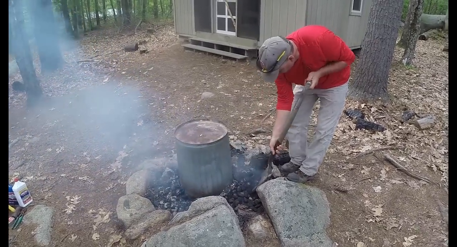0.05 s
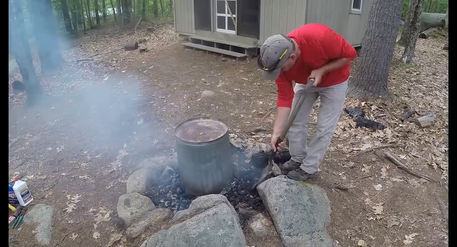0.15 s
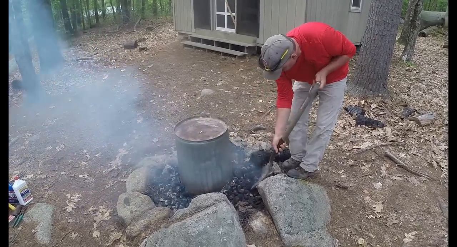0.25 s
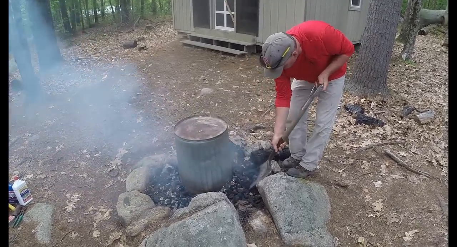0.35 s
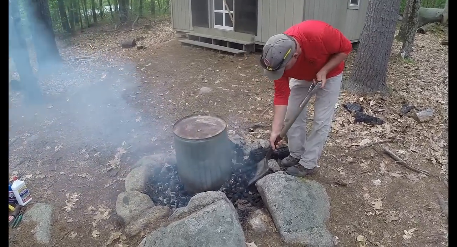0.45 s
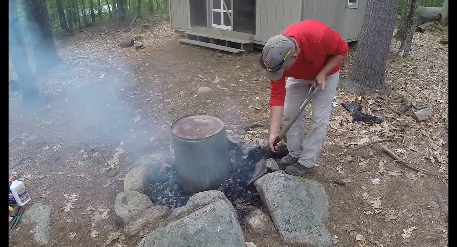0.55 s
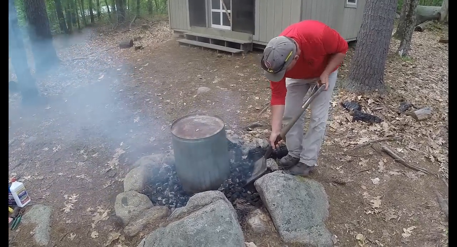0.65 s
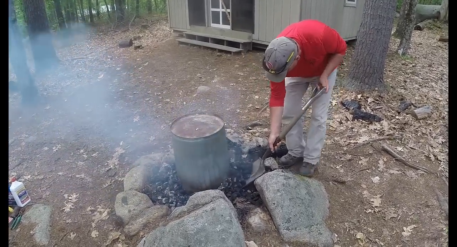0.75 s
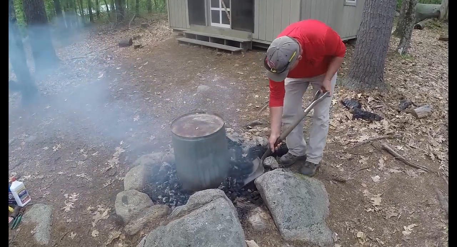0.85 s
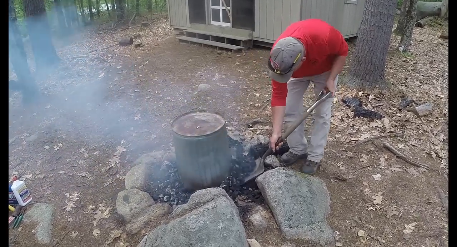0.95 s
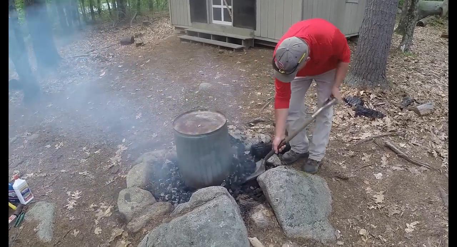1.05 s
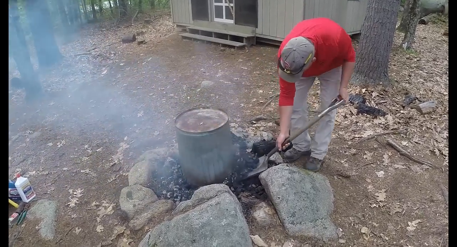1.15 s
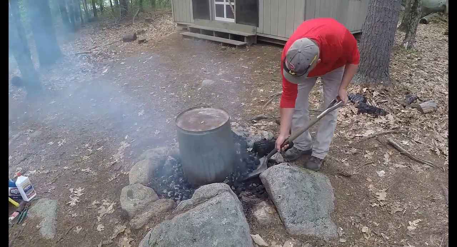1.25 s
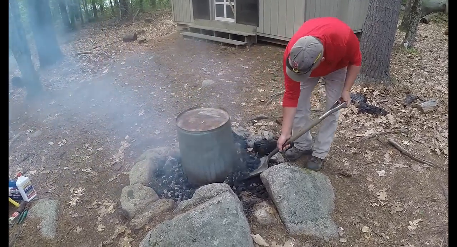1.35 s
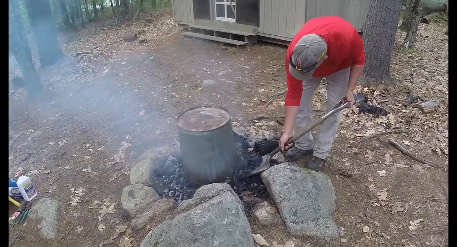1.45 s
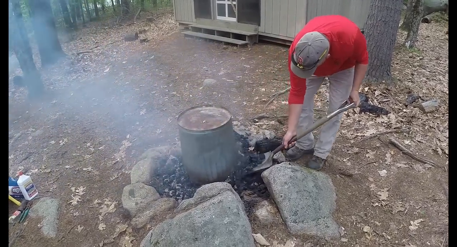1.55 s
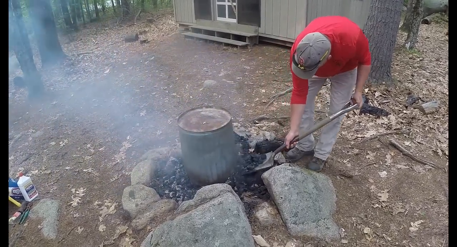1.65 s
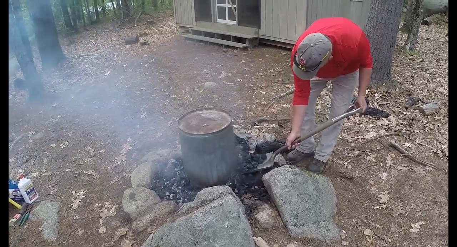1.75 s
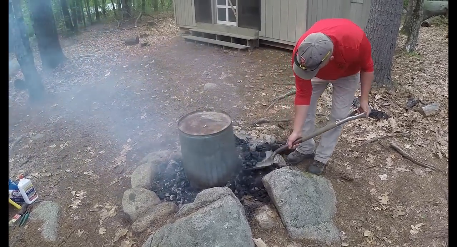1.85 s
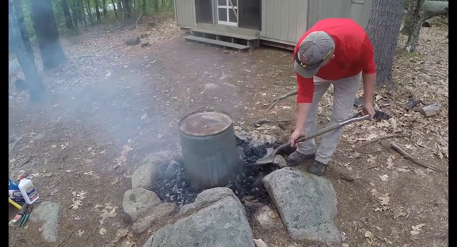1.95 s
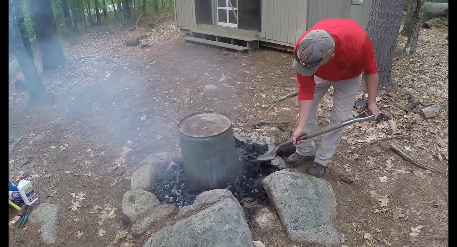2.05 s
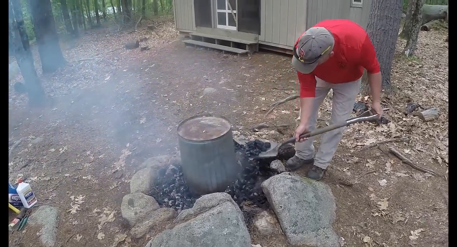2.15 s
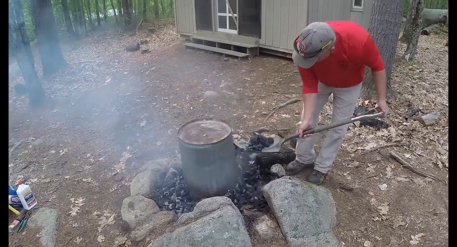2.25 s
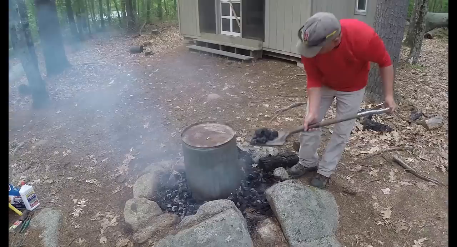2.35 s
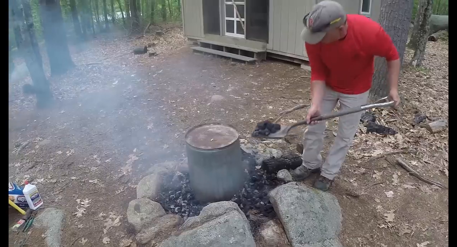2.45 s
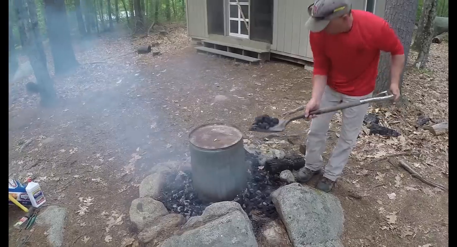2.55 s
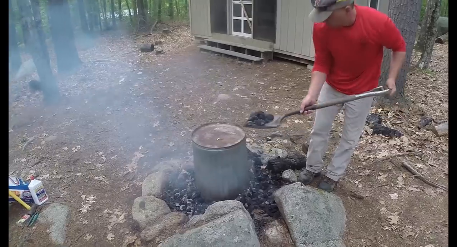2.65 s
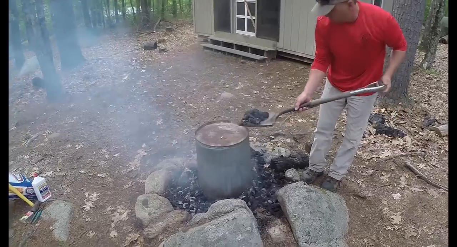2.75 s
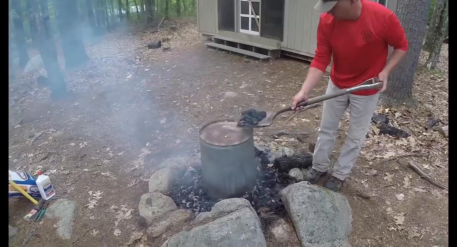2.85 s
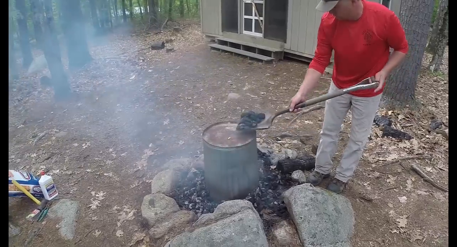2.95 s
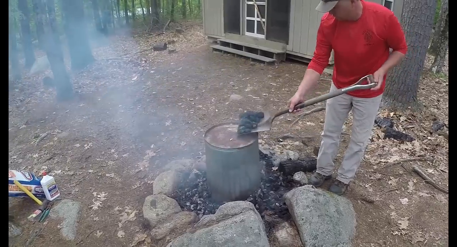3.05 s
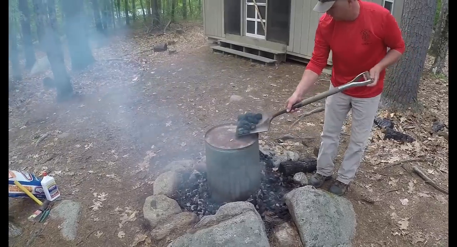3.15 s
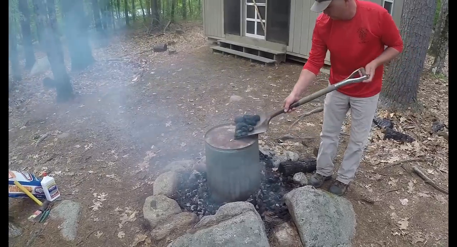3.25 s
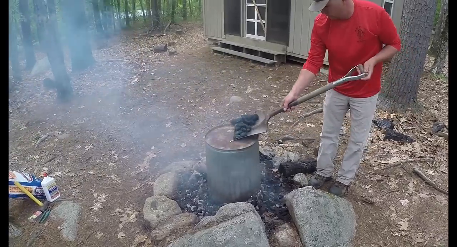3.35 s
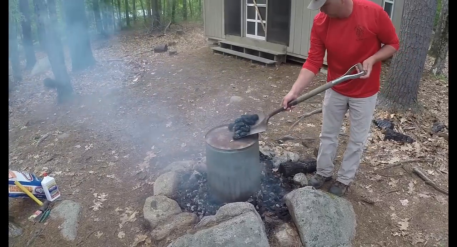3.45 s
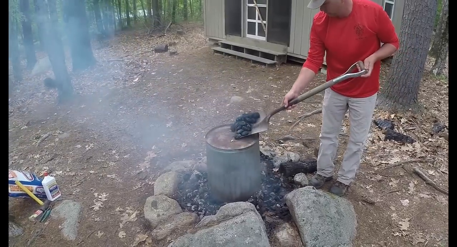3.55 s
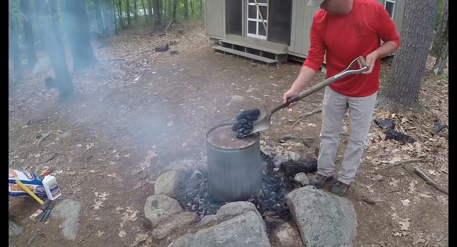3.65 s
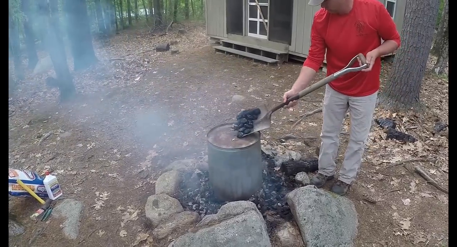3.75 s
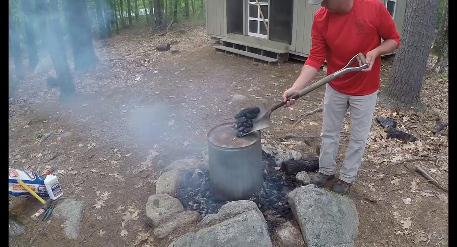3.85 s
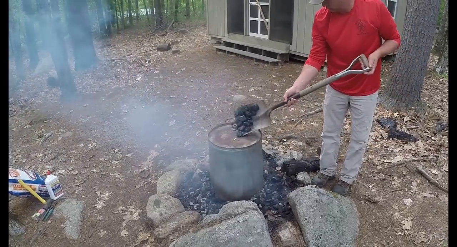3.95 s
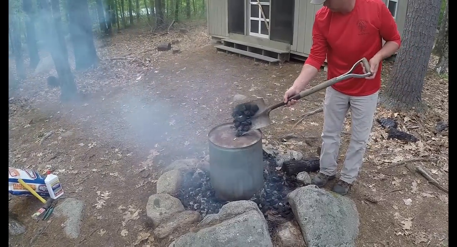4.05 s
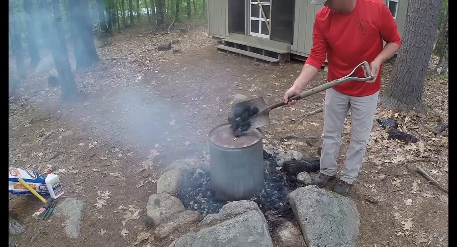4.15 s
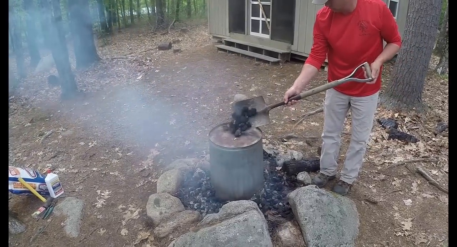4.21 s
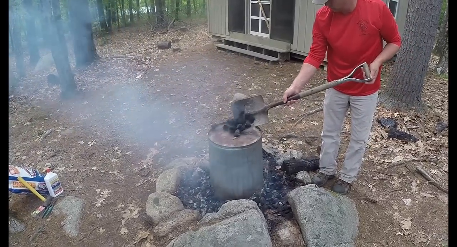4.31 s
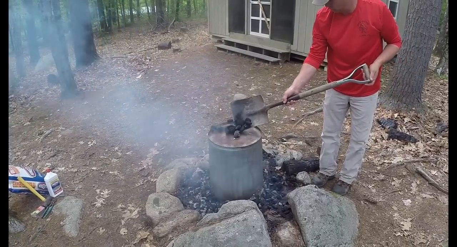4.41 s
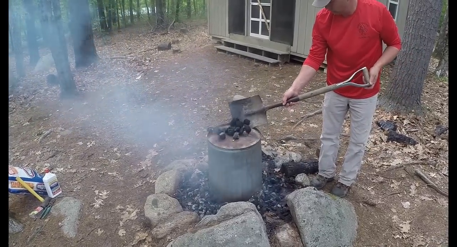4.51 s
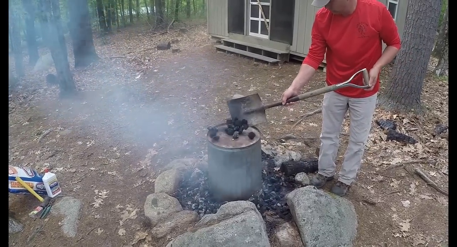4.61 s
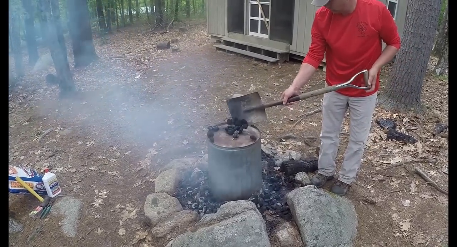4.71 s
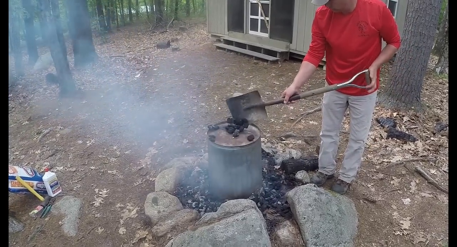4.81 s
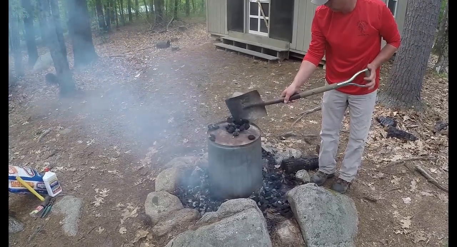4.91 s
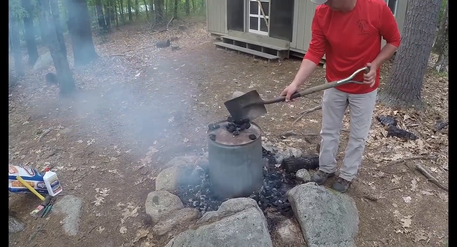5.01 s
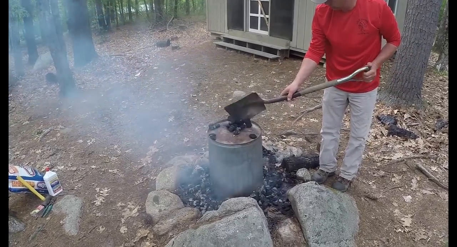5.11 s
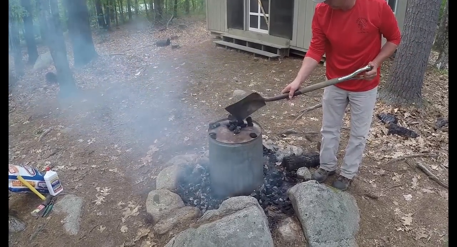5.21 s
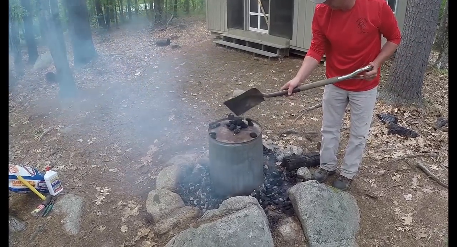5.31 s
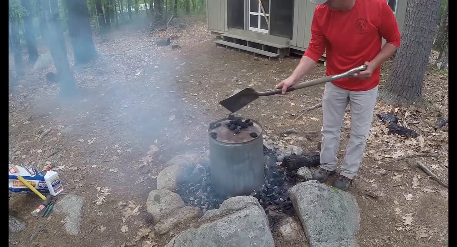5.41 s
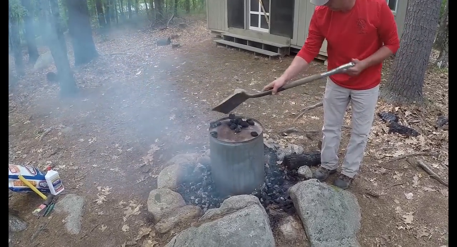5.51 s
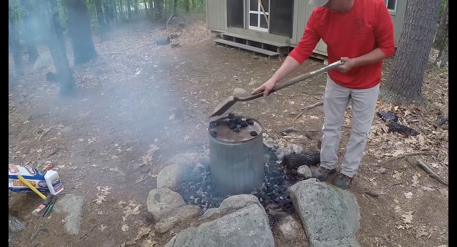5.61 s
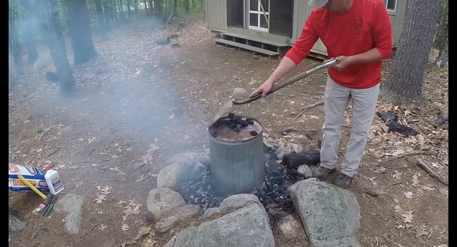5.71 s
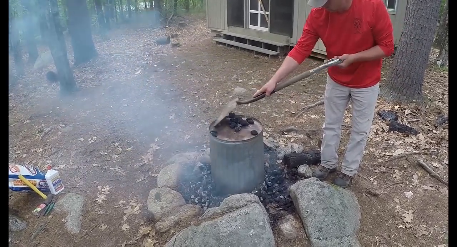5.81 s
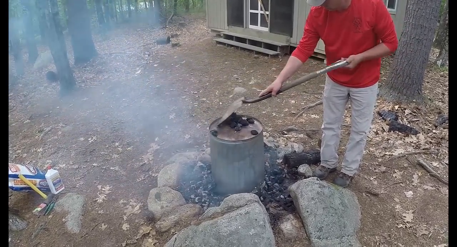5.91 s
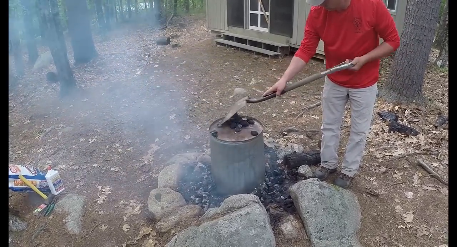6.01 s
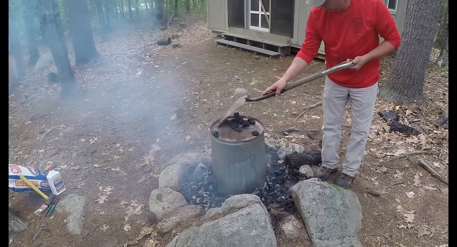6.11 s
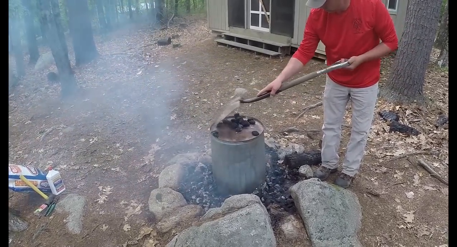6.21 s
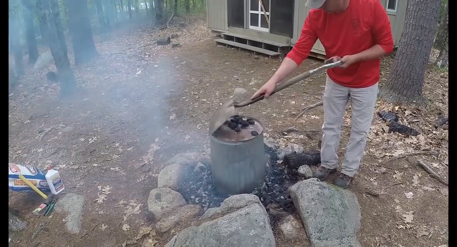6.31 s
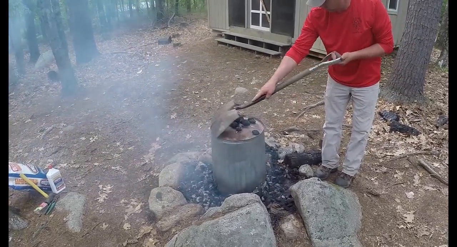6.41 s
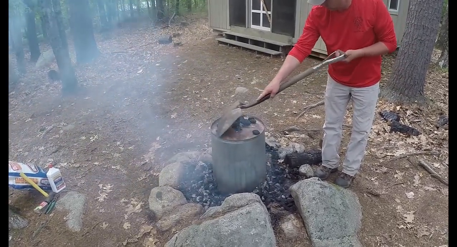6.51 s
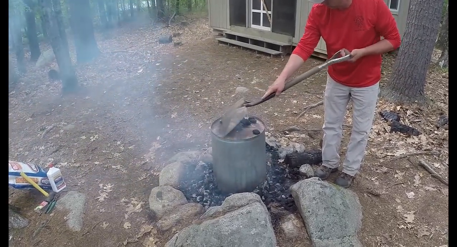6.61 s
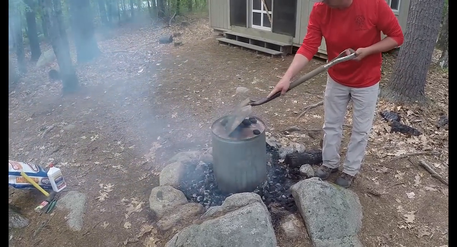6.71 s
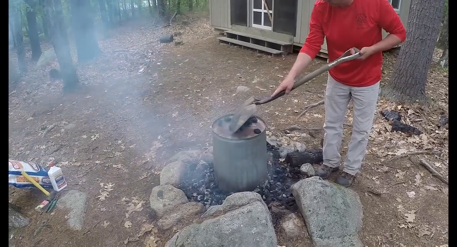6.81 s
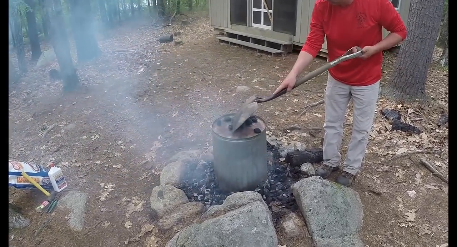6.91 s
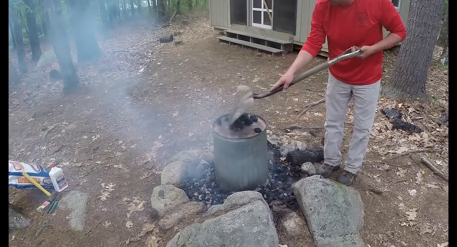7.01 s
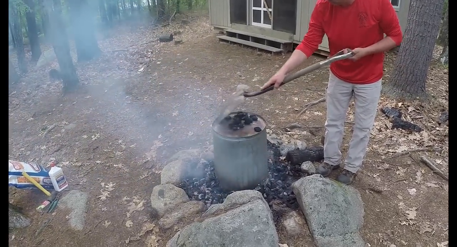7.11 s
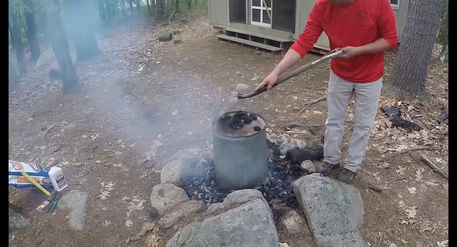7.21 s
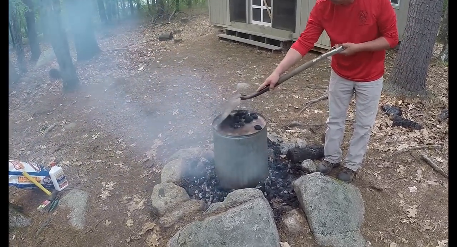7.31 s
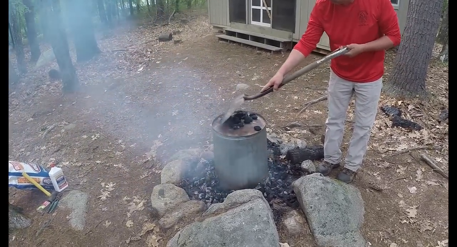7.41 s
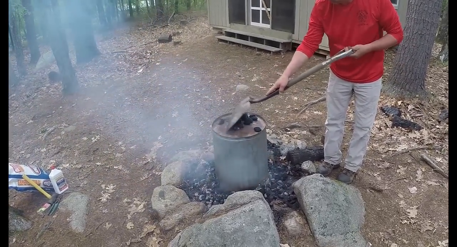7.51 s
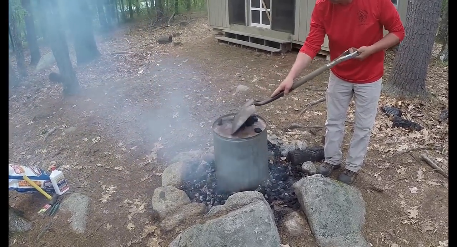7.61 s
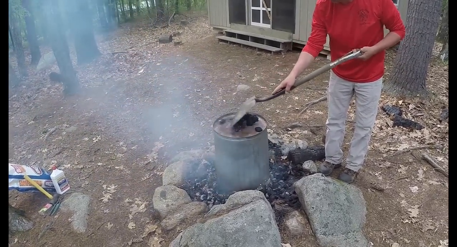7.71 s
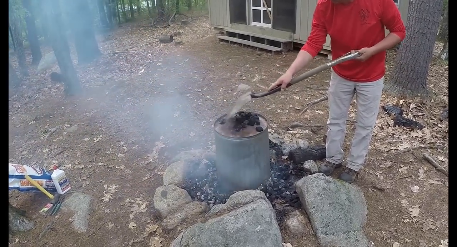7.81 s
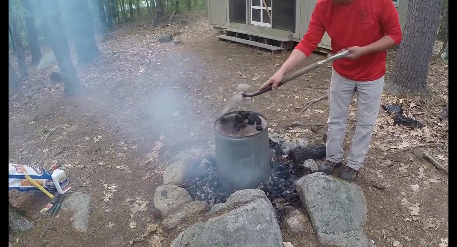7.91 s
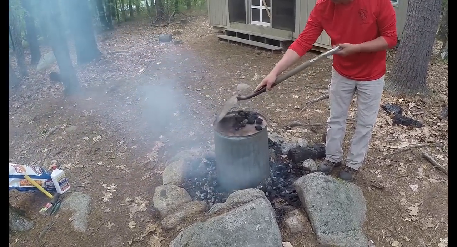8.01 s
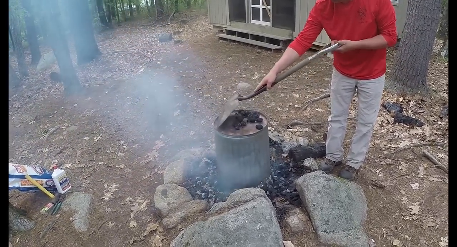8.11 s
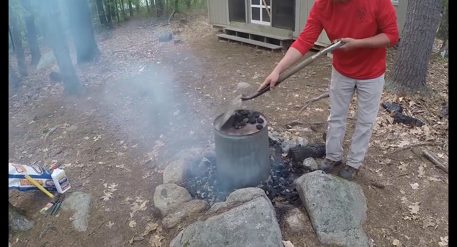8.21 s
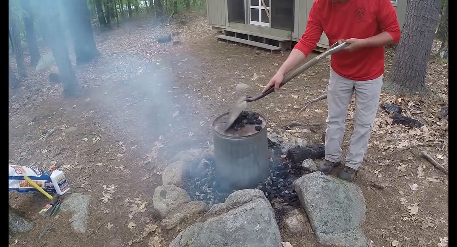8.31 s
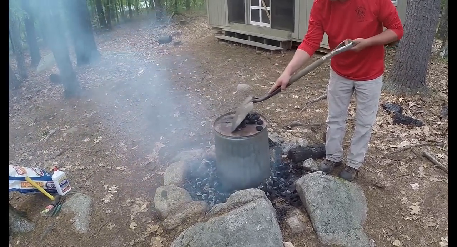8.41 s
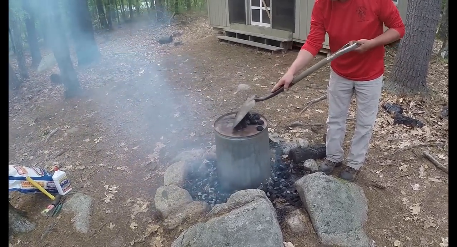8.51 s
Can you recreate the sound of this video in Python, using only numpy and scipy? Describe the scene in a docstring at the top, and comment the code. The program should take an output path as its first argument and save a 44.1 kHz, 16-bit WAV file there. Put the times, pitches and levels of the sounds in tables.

```python
"""Coals crunch and grate first, as a steel shovel digs lit charcoal out of a fire pit in the woods.
Then the blade knocks on an upturned metal can, lumps tumble onto its lid, and the blade scrapes them across.
Bursts of tiny contacts excite the ringing blade, the dull heap and the modes of the can, whose lid booms.
One microphone hears it all, with a short echo from trees and cabin and quiet, rumbling woodland air."""
import sys
import numpy as np
from scipy import signal
from scipy.io import wavfile
from scipy.ndimage import uniform_filter1d

SR = 44100
rng = np.random.default_rng(int(sys.argv[2]) if len(sys.argv) > 2 else 0)


def output_pcm(signal):
    """Save a mono or channel-first signal as 16-bit PCM at the path in sys.argv[1].

    Samples are clipped to [-1, 1] before scaling.
    """
    pcm = np.clip(np.atleast_2d(signal).T, -1, 1) * 32767
    wavfile.write(sys.argv[1], SR, np.round(pcm).astype(np.int16))


N = 377496
TIME = np.arange(N) / SR
RING = TIME[:26000]  # time axis of one ring, in seconds


def amp(db):
    """Decibels to gain."""
    return 10 ** (np.asarray(db) / 20)


def unit(x):
    """Scales to an energy of one."""
    return x / np.sqrt(np.sum(x ** 2) + 1e-20)


def struck(x, size=1100):
    """Scales a blow so that its first 25 ms have an rms of one."""
    return x / np.sqrt(np.mean(x[:size] ** 2) + 1e-20)


def read(points, hz):
    """Reads a table on a log-frequency axis."""
    f, value = np.transpose(points)
    return np.interp(np.log(hz + 1), np.log(f), value)


def add(mix, s, sound):
    """Mixes a sound in at time s."""
    part = mix[max(round(s * SR), 0):][:len(sound)]
    part += sound[:len(part)]


def through(x, response):
    """Plays x through an impulse response."""
    return signal.oaconvolve(x, response)[:len(x)]


def colour(points, size=4096):
    """Causal (minimum-phase) impulse response with the given spectrum, at an energy of one."""
    hz = abs(np.fft.fftfreq(size, 1 / SR))
    log_gain = np.log(amp(read(points, hz)))
    spectrum = np.exp(np.conj(signal.hilbert(log_gain)))
    return unit(np.fft.ifft(spectrum).real[:size // 2])


def favour(x, hz, depth_db):
    """The spot and hardness of a contact favour one region of the spectrum."""
    hump = [(hz / 3.35, -depth_db), (hz, 0), (hz * 2.85, -depth_db)]
    return through(x, colour(hump, size=1024))


def dense_ring(t60s, size=256):
    """Countless modes or echoes: noise in which each band dies at its own speed."""
    hz, t, bands = signal.stft(rng.standard_normal(len(RING)), SR, nperseg=size)
    fade = amp(-60 * t / read(t60s, hz)[:, None])
    return unit(signal.istft(bands * fade, SR, nperseg=size)[1][:len(RING)])


def modal_ring(modes, spread_db):
    """Damped sines; where the blow lands sets the strength and sign of each, drawn at random."""
    hz, db, t60 = np.transpose(modes)[:, :, None]
    sign = rng.choice([-1, 1], hz.shape)
    weight = amp(db + spread_db * rng.standard_normal(hz.shape)) * sign
    decay = np.exp(-np.log(1000) * RING / t60)
    return unit((weight * decay * np.sin(2 * np.pi * hz * RING)).sum(0))


def contacts(length, per_s, spread_db):
    """Random tiny impacts of uneven size, rms one."""
    size = amp(spread_db * np.minimum(rng.exponential(1, length), 3.5))
    size = size * rng.choice([-1, 1], length)
    hit = rng.random(length) < per_s / SR
    return unit(size * hit) * np.sqrt(length)


# Colour of the air between the trees. Each row: frequency in Hz, relative level in dB.
AIR_COLOUR = [(15, -45), (25, -4.5), (87, -1.5), (156, -10.5), (336, -20.5), (759, -22), (1510, -29),
              (1710, -29.5), (2050, -32.5), (2390, -29.5), (2580, -31), (6960, -40), (11000, -49.5),
              (14300, -81), (22000, -120)]
AIR_DB = -47  # level about which the air swells


def air():
    """Low outdoor rumble and a faint hiss of leaves: coloured noise that swells slightly and slowly."""
    rates_hz = np.geomspace(.3, 6, num=12)
    swell = sum(np.sin(2 * np.pi * (f * TIME + rng.random())) for f in rates_hz)
    return amp(AIR_DB + 0.15 * swell) * through(rng.standard_normal(N), colour(AIR_COLOUR))


# Echo of the clearing. Each row: frequency in Hz, time to fall by 60 dB in seconds.
WOODS_T60 = [(100, 0.37), (500, 0.59), (2500, 0.42), (9000, 0.44)]


def woods_echo(work):
    """Trees and cabin scatter the work back as a dense echo that builds over some milliseconds."""
    scatter = unit(dense_ring(WOODS_T60) * (1 - np.exp(-RING / 0.0066)))
    return amp(-12) * through(work, scatter)


# Shoves felt in the ground. Each row: start in seconds, level in dB before a common 1 dB cut.
THUDS = [(0.892, -32.5), (1.348, -30), (5.88, -35), (5.97, -38.5), (6.582, -39), (8.144, -22), (8.196, -38)]
# Colour of ash bed and soil. Each row: frequency in Hz, relative level in dB.
GROUND_COLOUR = [(20, -38), (45, -2.5), (90, -5), (130, -7), (220, -26.5), (600, -43), (3000, -77)]


def thuds():
    """The hardest shoves push through the ash bed and the soil: short, dull bursts of noise."""
    out = np.zeros(N)
    for s, db in THUDS:
        push = rng.standard_normal(len(RING)) * np.exp(-RING / .011)
        add(out, s, amp(db - 1.0) * struck(through(push, colour(GROUND_COLOUR))))
    return out


# Colour of grit on charcoal and steel. Each row: frequency in Hz, relative level in dB.
GRIT_COLOUR = [(300, -19.5), (900, 3), (1400, -4), (1900, -3), (2700, -2), (3600, -2), (4600, -4),
               (6000, -6.5), (8000, -9), (11000, -15.5)]


def clinks(strength, per_s, t60, size=3000):
    """Lumps of charcoal chink against each other, each at its own pitch, scaled by the strength curve."""
    out, t = np.zeros(N), RING[:size]
    for when, pitch, force, overtone in rng.random((round(per_s * N / SR), 4)):
        hz = 1200 * 6 ** pitch
        partials = np.sin(2 * np.pi * hz * t)
        partials = partials + .5 * np.sin(2 * np.pi * hz * (1.2 + overtone / 2) * t)
        chink = unit(partials * np.exp(-np.log(1000) * t / t60))
        level_db = read(GRIT_COLOUR, hz) + 5 * pitch + 10 * (force - 1.0)
        add(out, when * N / SR, strength[int(when * N)] * amp(level_db) * chink)
    return out * np.sqrt(SR / per_s)


def stick_slip(depth_db, size=700):
    """The load moves in fits and starts, a few tens a second: smoothed noise bends the level."""
    wobble = uniform_filter1d(uniform_filter1d(rng.standard_normal(N), size), size // 4)
    level_db = depth_db * np.clip(wobble / wobble.std(), -2, 1.5)
    return unit(amp(level_db)) * np.sqrt(N)


# every stroke starts and stops quickly; a few coals go on settling after it
ATTACK_S, RELEASE_S, SETTLE_DB, SETTLE_S = 0.0059, 0.049, -25, 0.15


def effort(strokes):
    """Strength of grit and of body: each stroke rises, swells or fades while it lasts, then settles."""
    power = np.zeros((2, N))
    for s, length, grit_db, body_db, swell_db in strokes:
        t = TIME[:2 * SR]
        after = np.maximum(t - length, 0)
        push = np.minimum(t / ATTACK_S, 1) * amp(swell_db * (np.minimum(t / length, 1) - .5))
        stop = np.maximum(np.exp(-after / RELEASE_S), amp(SETTLE_DB) * np.exp(-after / SETTLE_S))
        add(power[0], s, (amp(grit_db) * push * stop) ** 2)
        add(power[1], s, (amp(body_db) * push * stop) ** 2)
    return np.sqrt(power)


# Modes of the blade. Each row: frequency in Hz, relative level in dB, time to fall by 60 dB in seconds.
BLADE_MODES = [(1673, -1, .16), (1800, -5, .1), (2055, -6, .12), (2305, -1, .17), (2478, -2, .14),
               (2759, -4, .17), (2815, -5, .14), (2960, -5, .15), (3190, -2, .08), (4250, -7, .08),
               (4700, -6, .08), (5254, -7, .14), (6680, -9, .07)]


def blade(spectrum, ring_db):
    """A brittle tick, a short chink of charcoal and the ring of the loaded steel."""
    tick = amp(4) * unit(rng.standard_normal(len(RING)) * np.exp(-RING / 0.0059))
    tick[0] += 1
    coloured = unit(through(tick, colour(spectrum)))
    return unit(coloured + amp(ring_db) * modal_ring(BLADE_MODES, spread_db=2))


# Low drum modes of the lid, which rise as the load stiffens it. Each row: multiple of the boom pitch,
# relative level in dB, time to fall by 60 dB in seconds before scaling by sustain.
LID_MODES = [(1.16, -0.5, 0.66), (1.6, -6, .25), (1.93, 0, 0.31), (2.07, -4, .42)]
# Modes of the can's wall. Each row: frequency in Hz, relative level in dB, fall time in seconds, likewise.
CAN_MODES = [(340.9, 4, 0.21), (567, -1.5, 0.2), (653, -3, 0.31), (706, -15, 0.67), (750, -28, 0.28),
             (788, -8, 0.41), (850, -18, 0.6), (971, -6.5, 0.29), (1000, -30, 0.32), (1190, -35, 0.56),
             (1349, -8.5, 0.23)]
# Colour of the thin sheet. Each row: frequency in Hz, relative level in dB.
SHEET_COLOUR = [(100, -40), (180, -5), (280, -4.5), (340, -9.5), (440, -6), (560, -4), (700, -3), (900, -5),
                (1150, -4.5), (1500, -12), (2000, -14.5), (2700, -11.5), (4000, -24), (10000, -49.5)]
# Dense upper modes of the can. Each row: frequency in Hz, time to fall by 60 dB in seconds.
SHEET_T60 = [(170, 0.49), (400, 0.32), (900, 0.17), (2500, 0.22), (8000, 0.12)]


def can(lid_hz, sustain, modes_db):
    """The can struck at one spot: clear low modes over the dense clatter of thin sheet."""
    sheet = unit(through(dense_ring(SHEET_T60), colour(SHEET_COLOUR)))
    lid_modes = np.array(LID_MODES) * [lid_hz, 1, 1]
    modes = np.vstack([lid_modes, CAN_MODES]) * [1, 1, sustain]
    return unit(sheet + amp(modes_db) * modal_ring(modes, spread_db=3.0))


# The edge drags on the sheet. Each row: start in seconds, length in seconds, level in dB.
GROWLS = [(6.546, 0.436, -42), (7.569, 0.266, -41.5)]
GROWL_HZ, GROWL_ARCH_HZ = 235, 45.6  # pitch at the ends of a drag, and its rise in mid-stroke


def growls():
    """Quick slips of the edge ring the lid, whose pitch rises and falls with the pressure."""
    out = np.zeros(N)
    for s, length, db in GROWLS:
        t = np.arange(0, length, 1 / SR)
        slips = contacts(len(t), per_s=190, spread_db=3)
        pitch = GROWL_HZ + GROWL_ARCH_HZ * np.sin(np.pi * t / length)
        turn = np.exp(2j * np.pi * np.cumsum(pitch) / SR)
        pole = np.exp(-np.pi * 70 / SR)
        # a resonator at 0 Hz, turned up to the moving pitch
        ring = (turn * signal.lfilter([1], np.poly([pole, pole]), slips / turn)).real
        add(out, s, amp(db) * ring / ring.std() * signal.windows.tukey(len(t), .1))
    return out


# Strokes in the pit. Each row: start in seconds, length in seconds, grit on the blade in dB,
# crunch of the heap in dB, swell over the stroke in dB.
DIGS = [(0, 0.078, -43, -45.5, -3), (.15, 0.16, -56.5, -56, 8), (.345, 0.049, -37, -33.5, 1),
        (.53, 0.1, -46, -39.5, 2), (.73, 0.142, -47.5, -41.5, 11.5), (.87, 0.265, -41.5, -35, 1),
        (1.172, .165, -46.5, -35.5, -11.5), (1.348, 0.09, -42.5, -30.5, -12),
        (1.42, 0.47, -53, -45.5, -0.5), (1.96, 0.065, -51.5, -39, -8)]
# How far the blade is buried, nearly fully throughout. Each row: time in seconds, share from 0 to 1.
DEPTH = [(.45, 0.98), (.9, 1), (1.5, 0.97), (2.1, 1)]
# Colour of the shifting heap. Each row: frequency in Hz, relative level in dB.
HEAP_COLOUR = [(40, -22), (110, 4.5), (240, 2), (400, -3), (560, 1), (690, 7.5), (950, -8), (1250, -7.5),
               (1700, -18.5), (4000, -13), (10000, -97)]


def digging(count=6):
    """Coals grate on several spots of the blade; lumps of different sizes shift with a dull crunch."""
    grit, crunch = effort(DIGS) * stick_slip(depth_db=2)
    depth = np.clip(np.interp(TIME, *np.transpose(DEPTH)), 0, 1)
    out = np.zeros(N)
    for lump_hz in np.geomspace(240, 1900, num=count):
        grains = contacts(N, per_s=200, spread_db=3.5)
        lumps = contacts(N, per_s=70, spread_db=-0.5)
        hollow = through(rng.standard_normal(len(RING)) * np.exp(-RING / 0.0093), colour(HEAP_COLOUR))
        heap = unit(favour(hollow, lump_hz, depth_db=14.0))
        moved = depth ** ((500 / lump_hz) ** 2)  # large lumps shift almost fully throughout the digging
        out += through(grit * grains, blade(GRIT_COLOUR, ring_db=-8.5))
        out += through(moved * crunch * (0.68 * lumps + .5 * grains), heap)
    return out / np.sqrt(count) + amp(-2) * clinks(grit, per_s=170, t60=.07)


# The edge catches and slips, or snaps a coal. Each row: start in seconds, bite in dB, crunch in dB,
# centre of the bite in Hz, length in seconds.
CATCHES = [(.096, -38.5, -42, 2420, 0.014), (0.34, -30.5, -35.5, 3500, 0.022),
           (.355, -26.5, -40, 5050, .01), (0.389, -41, -35.5, 2500, 0.014), (0.41, -32.5, -43, 3180, .016),
           (.537, -57, -37, 3000, 0.035), (0.872, -48, -30, 1350, 0.022),
           (1.173, -35.5, -34.5, 2660, 0.029), (1.342, -34, -27, 1720, 0.013),
           (1.362, -35, -50, 3000, 0.0063), (1.839, -44, -55, 1730, 0.011),
           (1.965, -55, -40.5, 1300, 0.0074), (2.762, -55, -53, 2250, 0.035),
           (4.123, -42.5, -43, 2340, 0.029), (4.83, -36.5, -48, 2390, 0.01), (4.936, -40, -30, 2380, 0.032),
           (5.833, -34.5, -41, 1260, 0.012), (5.874, -30, -41, 2570, 0.0064), (5.92, -30, -58, 2400, 0.068),
           (5.972, -27.5, -51, 2570, 0.037), (6.019, -34, -39.5, 3270, 0.015),
           (6.373, -52.5, -49, 2470, 0.061), (6.583, -27, -38, 2300, 0.0072),
           (6.637, -28.5, -36, 2510, 0.018), (6.696, -30.5, -35, 3280, .017),
           (6.922, -33.5, -55, 5440, 0.028), (7.435, -39.5, -42, 2330, 0.0049),
           (7.499, -50, -55, 5250, .03), (7.561, -37.5, -33.5, 5700, .02), (8.403, -37.5, -48, 2590, 0.019)]


def catches():
    """The edge sticks and lets go in a short burst of fractures."""
    out = np.zeros(N)
    for s, bite_db, crunch_db, centre_hz, length in CATCHES:
        u = RING / max(length, .002)
        fractures = contacts(len(RING), per_s=1800, spread_db=1.5)
        force = unit(fractures * (1.17 + 2 * u) * np.exp(-2.2 * u))
        force[0] += .15
        bite = favour(through(force, blade(GRIT_COLOUR, ring_db=-8.5)), centre_hz, depth_db=8)
        # a bright bite moves only small lumps
        crunch = favour(through(force, colour(HEAP_COLOUR)), centre_hz / 3.4, depth_db=3)
        add(out, s, amp(bite_db) * struck(bite) + amp(crunch_db) * struck(crunch))
    return out


# Colour of a hard crack. Each row: frequency in Hz, relative level in dB.
CRACK_COLOUR = [(300, -3.5), (1000, -3), (1800, -0.5), (2600, -3), (4500, -5.5), (7000, -16.5),
                (11000, -24.5)]


def sliding(strokes, low_hz, high_hz, grains_per_s, ring_db, clink_db, count=6):
    """Lumps roll and drum on several spots of the lid, with grit scraping under the steel."""
    grit, drumming = effort(strokes) * stick_slip(depth_db=0.5)
    out = np.zeros(N)
    for spot_hz in np.geomspace(low_hz, high_hz, num=count):
        grains = contacts(N, per_s=grains_per_s, spread_db=2.5)
        lumps = contacts(N, per_s=14, spread_db=1.5)
        loaded = can(rng.uniform(168, 230), sustain=.5, modes_db=-3)
        lid = unit(favour(loaded, spot_hz, depth_db=11.5))
        lid += amp(-18) * blade(CRACK_COLOUR, ring_db=-10)  # each contact clicks on the lid
        out += through(grit * (0.51 * grains + 0.15 * lumps), blade(GRIT_COLOUR, ring_db))
        out += through(drumming * (.9 * lumps + .3 * grains), lid)
    return out / np.sqrt(count) + amp(clink_db) * clinks(grit, per_s=300, t60=.06)


# Coals slide off the blade and roll on the lid. Each row: start in seconds, length in seconds, grit in dB,
# drumming of the lid in dB, swell over the slide in dB.
SLIDES = [(3.4, 0.13, -53.5, -45.5, -9), (3.62, .15, -46, -44, -0.5), (3.87, .2, -47, -47, -6.5),
          (4.14, 0.16, -41.5, -40.5, 2), (4.34, 0.396, -40, -26.5, -3.5), (4.75, 0.17, -37, -35, -3),
          (5.0, 0.49, -52, -44.5, -2), (5.55, 0.16, -50, -54.5, 2.5)]


def pour():
    """Coals leave the blade and tumble, drumming over a wide range of the lid's spectrum."""
    return sliding(SLIDES, low_hz=198.6, high_hz=1330, grains_per_s=230, ring_db=0.5, clink_db=-2.5)


# The blade pushes coals over the lid. Each row: start in seconds, length in seconds, grit in dB,
# drumming of the lid in dB, swell over the stroke in dB.
SCRAPES = [(5.835, 0.18, -37.5, -35, -2.5), (6.17, .1, -59, -50, -3), (6.545, 0.017, -44.5, -29, 1),
           (6.585, 0.18, -36, -34, 1), (6.75, 0.16, -43.5, -39.5, 15), (7.57, 0.11, -34, -36.5, 4.5),
           (7.69, 0.1, -42, -37, -8), (7.86, 0.36, -62.5, -51.5, -8), (8.26, 0.27, -40.5, -37.5, 8),
           (8.48, 0.076, -30.5, -37.5, 18.5)]


def scrape():
    """The pressing blade damps the lid's lowest modes and grinds more finely than the pour."""
    return sliding(SCRAPES, low_hz=296, high_hz=1230, grains_per_s=940, ring_db=-2, clink_db=0)


LOADED_S = 4.3  # from this time on, coals on the lid damp it


def knock(s, clang_db, boom_db, crack_db, hz, centre_hz, hold, chatter_db):
    """One blow sets the lid drumming; a rattle follows the swing and stops with it."""
    u = RING / max(hold, .005)
    swing = np.exp(-.7 * u) / (1 + (u / 1.2) ** 8)  # dies gently, then drops away abruptly
    # the bare lid rings on; coals lying on it damp it
    sustain, modes_db = (1.28, 2.5) if s < LOADED_S else (0.6, -3)
    hum = 0.092 * np.exp(-RING / (0.059 * sustain))
    turns = hz * np.cumsum(1 + 0.0061 * swing) / SR  # the sheet is stiffer while it swings wide
    boom = np.sin(2 * np.pi * turns) * (1 - np.exp(-RING / 0.0036)) * (swing + hum)
    force = amp(chatter_db) * unit(contacts(len(RING), per_s=900, spread_db=5.0) * swing)
    force[0] += 1
    clang = favour(through(force, can(hz, sustain, modes_db)), centre_hz, depth_db=11.5)
    crack = through(force, blade(CRACK_COLOUR, ring_db=-8.0))
    return amp(boom_db) * struck(boom) + amp(clang_db) * struck(clang) + amp(crack_db) * struck(crack)


# The blade knocks on the can. Each row: start in seconds, clang in dB, boom in dB, crack in dB,
# boom pitch in Hz, centre of the clang in Hz, time scale of the swing in seconds (5 ms at least).
BLOWS = [(3.338, -28.5, -28, -32, 177.6, 500, 0.011), (3.36, -29, -30.5, -41, 188, 318, 0.066),
         (3.567, -21, -14, -33.5, 173.4, 650, 0.058), (4.312, -24.5, -21.5, -44, 176.7, 336, 0.026),
         (4.575, -24, -27, -33, 171, 650, 0.026), (4.691, -25.5, -15, -39, 198.2, 410, 0.033),
         (5.535, -22, -23, -33.5, 190.5, 1150, 0.025), (6.919, -39, -34.5, -35.5, 174, 313, 0.06),
         (7.438, -36.5, -41, -45, 174, 410, 0.014), (8.147, -19.5, -17, -21.5, 176, 640, 0.0089),
         (8.196, -13, -12, -27.5, 176, 750, 0.03), (8.213, -20.5, -19, -23, 175.4, 900, 0.047)]
BLOW_CHATTER_DB = 1  # rattle against the blow itself
# Large lumps land on the lid. Each row: start in seconds, clang in dB, boom in dB, centre of the clang in Hz.
LUMPS = [(3.729, -54, -42, 650), (3.871, -42, -34, 595), (3.908, -37, -35, 370), (4.096, -42, -30, 353),
         (4.151, -42, -38, 646), (4.351, -23, -27, 540), (4.381, -22.5, -19, 580), (4.439, -24, -31, 686),
         (4.489, -22.5, -26, 635), (4.55, -19, -20, 417), (4.659, -25, -38, 394), (4.744, -29, -51, 770),
         (4.82, -32.5, -57, 757), (4.889, -23.5, -32, 577), (4.988, -35, -32.5, 446),
         (5.021, -32.5, -51, 750), (5.049, -32.5, -31.5, 485), (5.08, -33.5, -33, 910),
         (5.246, -29.5, -31, 716), (5.289, -33.5, -27, 665), (5.606, -35, -43, 736),
         (7.053, -40.5, -52, 345), (7.14, -40, -39, 555), (7.262, -40.5, -50, 383), (7.287, -42, -50, 554),
         (7.699, -56, -33, 400), (7.78, -35.5, -31, 616), (7.942, -37.5, -46, 620)]
LUMP_SWING_S, LUMP_CHATTER_DB = 0.031, -2  # time scale of the swing under a lump, and its rattle
# crack at a clang of 0 dB, and dB per dB: hard landings are brighter
LUMP_CRACK_DB, LUMP_CRACK_GROWTH = -7.5, 1.53
# the lid's pitch under lumps rises between these seconds, while the coals heap up on it
EMPTY_HZ, LOADED_HZ, HEAPING_S = 177.3, 214.3, (4.5, 4.8)


def knocks():
    """The blade strikes the can, and lumps land on a lid that the growing load stiffens."""
    out = np.zeros(N)
    for s, *blow in BLOWS:
        add(out, s, knock(s, *blow, BLOW_CHATTER_DB))
    for s, clang_db, boom_db, centre_hz in LUMPS:
        hz = np.interp(s, HEAPING_S, [EMPTY_HZ, LOADED_HZ])
        crack_db = LUMP_CRACK_DB + LUMP_CRACK_GROWTH * clang_db
        add(out, s, knock(s, clang_db, boom_db, crack_db, hz, centre_hz, LUMP_SWING_S, LUMP_CHATTER_DB))
    return out


def scene():
    """The work at the fire, its scatter from trees and cabin, and the air."""
    work = thuds() + growls() + digging() + catches() + pour() + scrape() + knocks()
    return (air() + woods_echo(work) + work)[None]


EDGE_HZ = 11050  # upper band limit


def record(dry):
    """The microphone signal: peaks are softly overloaded, then the band is limited."""
    pressed = 1.3 * np.tanh(dry / 1.3)
    lowpass = signal.firwin(511, EDGE_HZ, window=("kaiser", 8), fs=SR)
    return signal.oaconvolve(pressed, lowpass[None], "same")


dry = scene()
out = record(dry)
output_pcm(out)
```